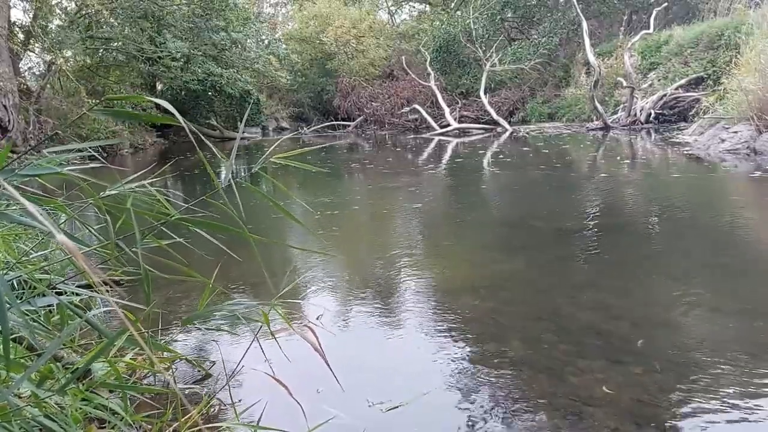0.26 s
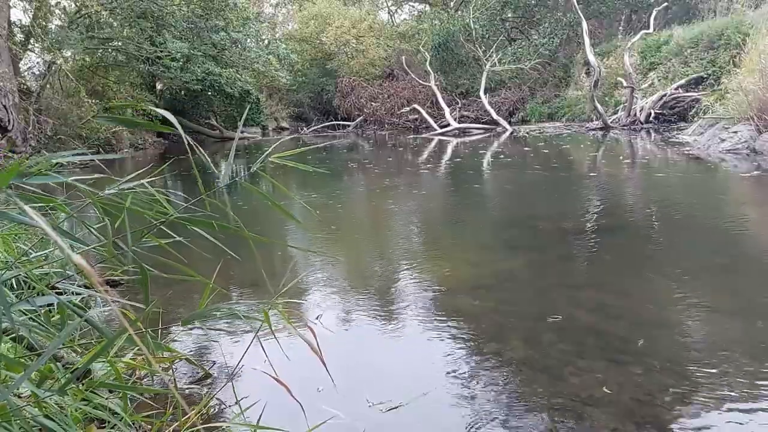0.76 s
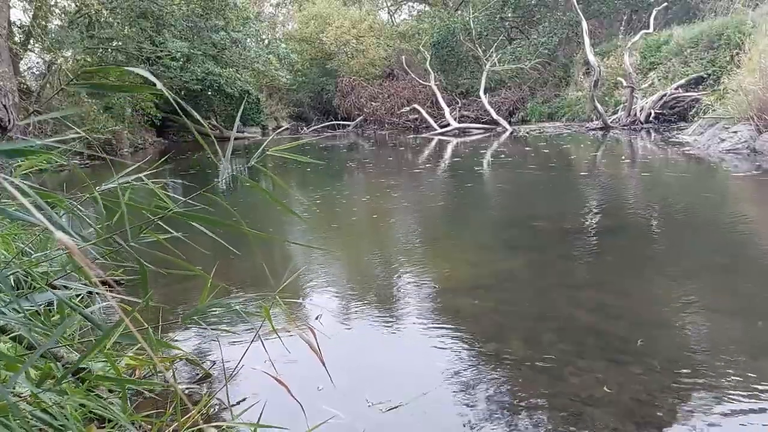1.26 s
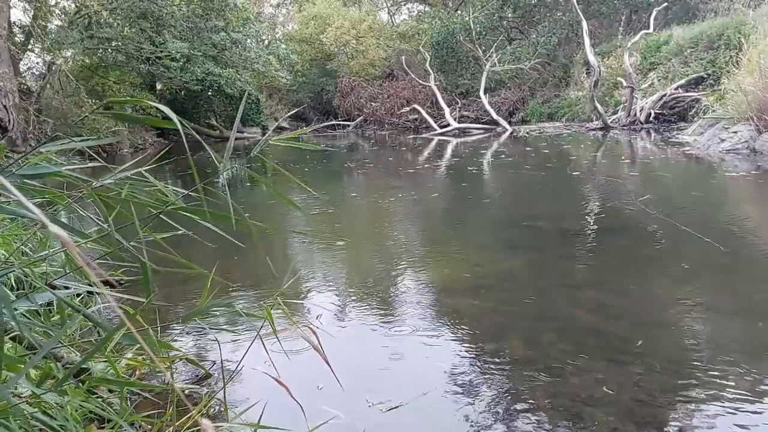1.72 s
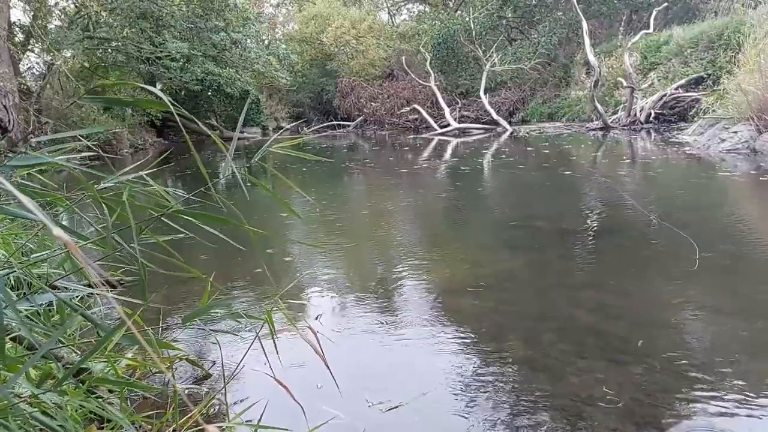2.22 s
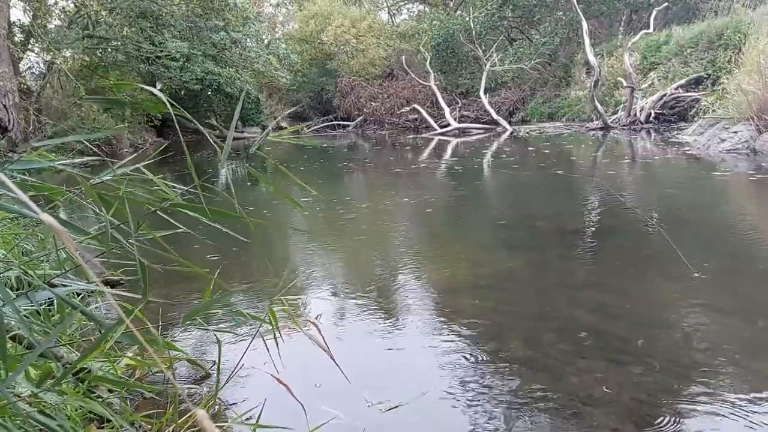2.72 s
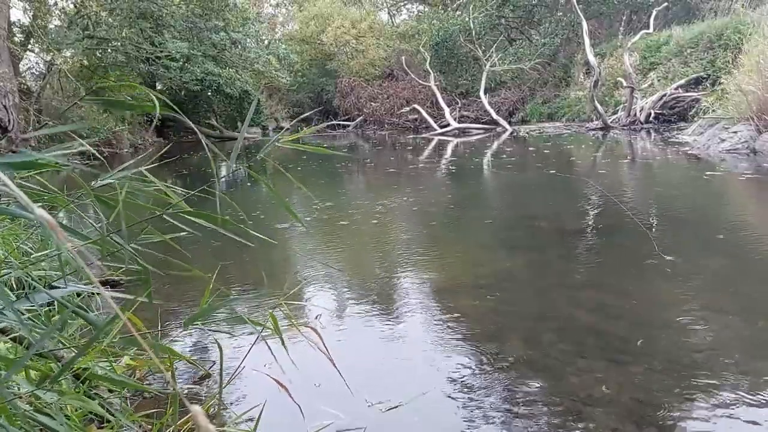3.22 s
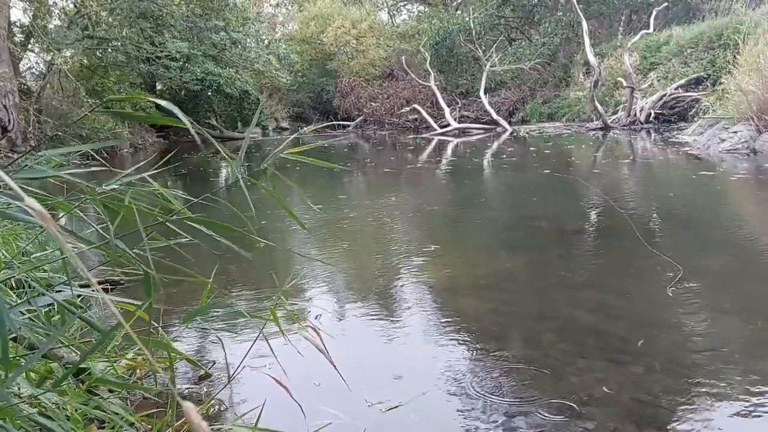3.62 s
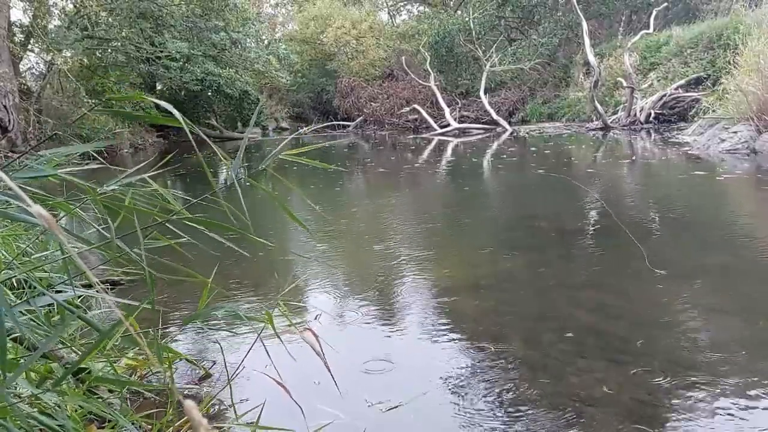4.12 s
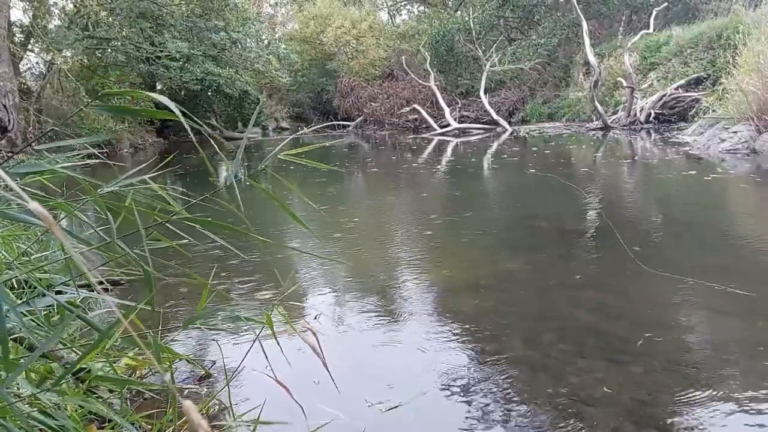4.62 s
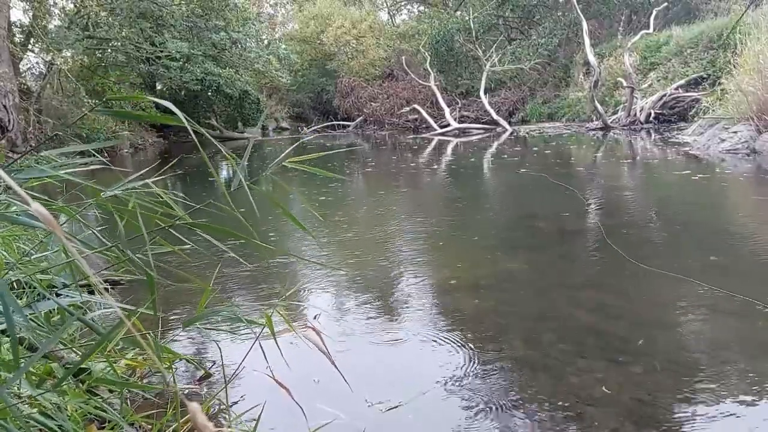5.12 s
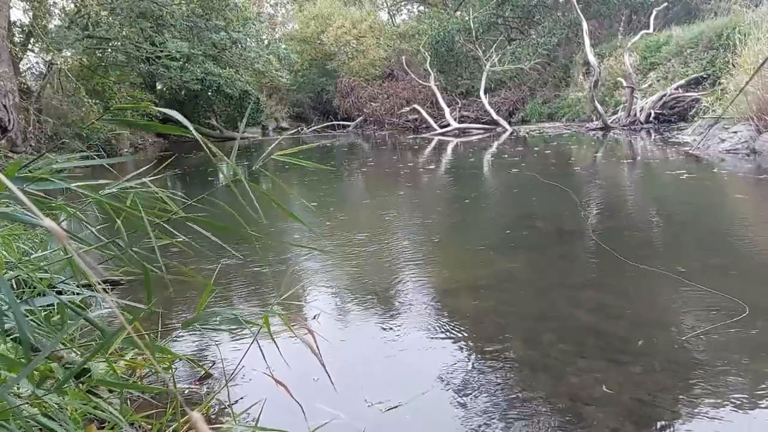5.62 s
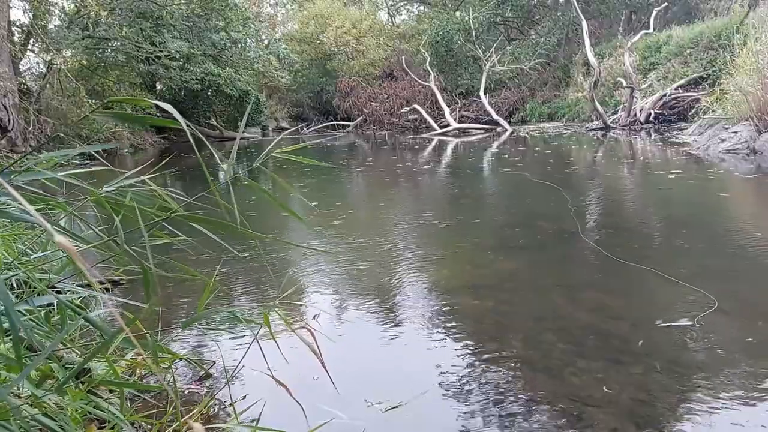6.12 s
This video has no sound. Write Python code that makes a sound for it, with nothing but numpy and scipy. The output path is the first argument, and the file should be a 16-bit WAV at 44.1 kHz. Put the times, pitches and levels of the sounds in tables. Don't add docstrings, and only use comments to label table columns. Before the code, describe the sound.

Beside a softly hissing stream, a fishing reel ratchets in a quick metallic rattle, clicks three more times, then line whips sharply through rod rings.

```python
import sys
import numpy as np
from scipy import signal
from scipy.fft import rfft, irfft
from scipy.io import wavfile
from scipy.ndimage import uniform_filter1d, minimum_filter1d, map_coordinates

SR = 44100
rng = np.random.default_rng(int(sys.argv[2]) if len(sys.argv) > 2 else 0)


def boost(x):
    u = np.asarray(x, float) / 20
    return 10 ** u


def to_wav(s):
    ch = np.atleast_2d(s).T
    pcm = np.round(np.clip(ch, -1, 1) * 32767)
    wavfile.write(sys.argv[1], SR, pcm.astype(np.int16))


N = 280476

# frequency in Hz, t60 in s, level under the main pawl in dB,
# level under the second pawl in dB.
FRAME_MODES = [(4190, 0.003, 0, -18.5), (3460, 0.018, -25.5, -34), (3780, 0.0077, -3.5, -2.5),
               (4630, 0.0061, -4, -1), (4960, 0.011, -16.5, -2.5), (5420, 0.019, -0.5, -5),
               (5975, 0.013, 0.5, -1), (5740, 0.0052, -85.5, -30), (8800, 0.0037, -1.5, -3),
               (9000, 0.012, -25, -8.5), (10610, 0.0063, -3, -11.5), (11440, 0.0093, -29, -8),
               (13010, 0.0042, 2.5, -4.5), (14900, 0.003, -23.5, -21)]
# frequency in Hz, time to the top in s,
# level under the main pawl in dB, level under the second pawl in dB.
SPOOL_MODE = (1995, .0017, -12, -29)
# delay in s, signed size for the main pawl, for the second pawl.
BOUNCES = [
    (0, -1.0, -.6),
    (.0004, .15, .7),
    (.0009, .35, -.65),
    (.0014, -.25, .45),
    (.0020, .15, -.25),
]
# time in s, speed in teeth per s.
PULLS = [
    [(1.1256, 50.15), (1.1727, 127.89), (1.1863, 138.29), (1.2013, 134.33), (1.2824, 71.41), (1.373, 0)],
    [(2.6639, 37.4), (2.7217, 0)],
]
SECOND_LAG_TEETH = .484
PAWL_DB, PAWL_SPREAD_DB = (.2, -4.2), (.3, 1.0)
LONGEST_T60_S = .010
CRACK_HZ, CRACK_T60_S, CRACK_DB, CRACK_LATE_S = 3500, .0012, (8, 0), .0003
HAND_ON_S, HAND_T60_SHARE, HAND_DB, HAND_SHARP = 2.0, .9, -2, 1.03

# start in seconds, peak in dB, length in s.
JERKS = [
    (3.902, -5.5, .0033),
    (3.9058, -3, .0009),
    (3.9073, -.5, .0036),
    (3.9128, -6, .002),
    (3.9152, -6.5, .0025),
    (3.9175, -4, .0038),
    (3.9237, -.5, .0022),
    (3.9268, -9, .003),
    (3.931, -22, .009),
]
# frequency in Hz, density in dB per Hz.
WHIP_SPECTRUM = [(290, -74.5), (500, -32), (876, 27), (2800, -29.5), (4440, -28.5), (5510, -26),
                 (7780, -47.5), (13200, -39), (14200, -29.5), (15500, -70.5)]
WHISTLE_HZ, WHISTLE_FALL_HZ_PER_S = 6220, 36300
EDGE_HZ, EDGE_FALL_HZ_PER_S = 4800, 88000
# start in seconds, frequency in Hz, level in dB, t60 in s.
ROD_MODES = [
    (3.9285, 628, -18.5, .025),
    (3.9284, 1240, -18.5, .012),
    (3.9294, 1800, -49, .010),
    (3.929, 2700, -24, .006),
    (3.936, 870, -18, 0.046),
]

# onset in seconds, level in dB, length in s.
LEAD_INS = [
    (1.1254, -38, .008),
    (2.6636, -39, .009),
    (3.902, -36, .003),
]
# width as share of pitch, rise in s, t60 in s.
TICK, SQUEAK, DRIP = (.6, .0005, .006), (.02, .0018, .012), (.05, .0015, .17)
RUB, RUSTLE = (.16, .01, .15), (.6, .006, .15)
# start in seconds, level in dB, frequency in Hz.
TICKS = [
    (2.001, -47.5, 10500),
    (2.23, -48.5, 11000),
    (2.249, -44, 1500),
    (3.30, -54, 9000),
    (3.35, -47, 10500),
    (3.8472, -42.5, 12500),
    (3.8494, -34.5, 5200),
    (4.245, -54, 2500),
]
# start in seconds, level in dB, frequency in Hz.
SQUEAKS = [
    (.857, -28, 5280),
    (.8572, -42, 8400),
    (.869, -49, 8600),
    (.895, -39, 5300),
    (5.37, -52, 5100),
]
# start in seconds, level in dB, frequency in Hz.
DRIPS = [
    (1.33, -52, 613),
    (4.245, -46.5, 867),
    (5.088, -46, 864),
    (5.47, -56, 1120),
    (5.535, -57, 2030),
    (5.669, -46.5, 529),
    (5.678, -50, 881),
    (5.686, -53, 1760),
]
# start in seconds, level in dB, frequency in Hz.
RUBS = [
    (0.866, -49, 5180),
    (3.235, -48, 5830),
    (5.177, -55.5, 4200),
    (5.326, -49, 4320),
    (5.54, -48, 4160),
    (5.90, -54, 4300),
]
# start in seconds, level in dB, frequency in Hz.
RUSTLES = [
    (5.322, -54, 4500),
    (5.538, -53, 4600),
    (5.666, -57, 8000),
    (5.669, -50, 750),
    (5.672, -48.5, 3100),
    (5.899, -53.5, 4500),
]

# frequency in Hz, density in dB per Hz.
STREAM_SPECTRUM = [(24, -76.5), (40, -45.5), (113, -24.5), (165, -39), (200, -10), (302, -2.5), (372, -5),
                   (403, -5), (726, -8.5), (1800, -17), (2340, -21), (3960, -120)]
# frequency in Hz, density in dB per Hz.
LEAVES_SPECTRUM = [(880, -32), (1500, -40), (2110, -2), (2310, -1), (3120, 2), (5720, 2), (6890, -7),
                   (8130, -9.5), (13300, -5), (14200, -7.5), (15500, -29)]
STREAM_DB, LEAVES_DB, LEAVES_FADE_DB_PER_S = -52.5, -55, -0.01
BANK_DB, BANK_T60_S, BANK_END_S = -23.5, 0.19, 0.044
# time in s, gain in dB.
GAIN = [
    (0, 0.5),
    (1.03, 1.5),
    (1.4, -3.5),
    (2.5, -4),
    (3.1, 0.5),
    (3.81, -1),
    (3.97, -3.5),
    (4.9, -5),
    (5.33, -1.5),
    (6.36, -2),
]
HUSH_S, HUSH_DB = (3.885, 3.894), -30


def rms_one(x):
    return x / np.sqrt(np.mean(x ** 2) + 1e-20)


def ring(clicks, hz, t60):
    r, w = boost(-60 / (t60 * SR)), 2 * np.pi * hz / SR
    return signal.lfilter([0, np.sin(w)], [1, -2 * r * np.cos(w), r * r], clicks + 1e-18)


def band(x, low_hz, high_hz):
    edges = [max(low_hz, 20), min(high_hz, .45 * SR)]
    return signal.sosfilt(signal.butter(2, edges, "band", fs=SR, output="sos"), x)


def coloured(white, spectrum):
    hz = np.maximum(np.arange(len(white) // 2 + 1) * SR / len(white), 1)
    point_hz, point_db = np.transpose(spectrum)
    weight_db = np.interp(np.log(hz), np.log(point_hz), point_db)
    return rms_one(irfft(rfft(white) * boost(weight_db), len(white)))


def add(out, s, sound):
    i = round(s * SR)
    out[i:i + len(sound)] += sound[:N - i]


def landings():
    rows = []
    for pull in PULLS:
        s, speed = np.transpose(pull)
        t = np.arange(s[0], s[-1], 1 / SR)
        teeth = np.cumsum(np.interp(t, s, speed)) / SR
        for k in range(int(teeth[-1]) + 1):
            for second in (0, 1):
                mark = k + second * SECOND_LAG_TEETH
                if mark < teeth[-1]:
                    rows.append((np.interp(mark, teeth, t), second))
    return rows


def reel():
    out, t = np.zeros(N), np.arange(1200) / SR
    thin = signal.butter(6, 2500, "high", fs=SR, output="sos")
    drops = landings()
    spool_hz, spool_top_s, *spool_db = SPOOL_MODE
    chance = rng.standard_normal((len(drops), len(FRAME_MODES) + 2 * len(BOUNCES)))
    for (s, second), draw in zip(drops, chance):
        peak_db = PAWL_DB[second] + PAWL_SPREAD_DB[second] * draw[-5]
        held = s > HAND_ON_S
        uneven_db = (.8 + .7 * second) * draw
        detune = 1 + .015 * draw[::-1]

        blows = np.zeros(len(t))
        for (delay, *size), late, harder in zip(BOUNCES, draw[-5:], draw[-10:-5]):
            i = int(abs(delay * (1 + .07 * late)) * SR)
            blows[i] += size[second] * boost(1.8 * harder * (delay > 0))

        frame = np.zeros(len(t))
        for m, (hz, t60, *levels) in enumerate(FRAME_MODES):
            mode = ring(blows, hz * detune[m], min(t60, LONGEST_T60_S))
            frame += boost(levels[second] + uneven_db[m]) * mode
        frame *= 1 - np.exp(-t / .00015)
        first_blow = np.roll(blows * (t < .0002), int(CRACK_LATE_S * SR))
        crack = boost(CRACK_DB[second]) * ring(first_blow, CRACK_HZ, CRACK_T60_S)
        frame = signal.sosfilt(thin, crack + frame)
        frame = boost(peak_db - .8) * frame / np.max(np.abs(frame))

        age = t / (spool_top_s * HAND_T60_SHARE ** held)
        swell = boost(spool_db[second] + HAND_DB * held) * age * np.exp(1 - age)
        hz = spool_hz * HAND_SHARP ** held * (1 + .008 * draw[0])
        add(out, s, frame + swell * np.sin(2 * np.pi * hz * t))
    return signal.sosfilt(signal.cheby2(8, 30, 1450, "high", fs=SR, output="sos"), out)


def whip():
    out, t = np.zeros(N), np.arange(2000) / SR
    for s, peak_db, length in JERKS:
        since = s - JERKS[0][0]
        hz = WHISTLE_HZ - WHISTLE_FALL_HZ_PER_S * since
        edge_hz = EDGE_HZ - EDGE_FALL_HZ_PER_S * since
        white = rng.standard_normal((2, 4000))
        whistle = rms_one(band(white[0], hz - 260, hz + 260))[2000:]
        rush = coloured(white[1], WHIP_SPECTRUM)
        for _ in range(3):
            rush = band(rush, edge_hz, 21000)
        rush = rms_one(rush)[2000:]
        shape = (1 - np.exp(-t / 0.0016)) / (1 + (t / length) ** 4)
        jerk = shape * (0.73 * whistle + 1.1 * rush)
        add(out, s, boost(peak_db) * jerk / np.max(np.abs(jerk)))
    return out


def knock():
    out, t = np.zeros(N), np.arange(2000) / SR
    push = np.exp(-t / 0.00011) * (t / 0.000061) / 8
    for s, hz, level_db, t60 in ROD_MODES:
        add(out, s, boost(level_db) * ring(push, hz, t60))
    return out


def lead_ins():
    out = np.zeros(N)
    before_s = np.arange(1000, 0, -1) / SR
    for s, level_db, length in LEAD_INS:
        swell_noise = rms_one(band(rng.standard_normal(1500), 1400, 9000)[500:])
        add(out, s - 1000 / SR, boost(level_db - 14 * before_s / length) * swell_noise)
    return out


def puff(level_db, hz, share, rise, t60):
    t = np.arange(6000) / SR
    half_hz = share * hz / 2
    noise = rms_one(band(rng.standard_normal(8000), hz - half_hz, hz + half_hz)[2000:])
    clear = np.clip(1 - 5 * share, 0, .9)
    tone = np.sin(2 * np.pi * hz * t)
    sound = np.sqrt(1 - clear) * noise + np.sqrt(2 * clear) * tone
    shape = np.clip(t / rise, 0, 1) * boost(-60 * np.maximum(t - rise, 0) / t60)
    return boost(level_db) * rms_one(sound * shape) * np.sqrt(np.mean(shape ** 2))


def small_sounds():
    out = np.zeros(N)
    kinds = [(TICK, TICKS), (SQUEAK, SQUEAKS), (DRIP, DRIPS), (RUB, RUBS), (RUSTLE, RUSTLES)]
    for kind, rows in kinds:
        for s, level_db, hz in rows:
            add(out, s, puff(level_db, hz, *kind))
    return out


def bank(x, low_hz):
    t = np.arange(4400) / SR
    flutter = .4 + rms_one(band(rng.standard_normal(N), 120, 600))
    echoes = rng.standard_normal(len(t)) * boost(-60 * t / BANK_T60_S) * np.clip(t / 0.001, 0, 1)
    echoes *= boost(-900 * np.maximum(t - BANK_END_S, 0))
    scatter = boost(BANK_DB - 19.5) * signal.fftconvolve(x * flutter, echoes)[:N]
    return signal.sosfilt(signal.butter(8, low_hz, "high", fs=SR, output="sos"), scatter)


def drift(rate):
    r = np.exp(-80 * np.pi * rate / SR)
    slow = signal.lfilter([1], [1, -2 * r, r * r], rng.standard_normal(N // 40 + 2002))[2000:]
    return np.interp(np.arange(N) / 40, np.arange(len(slow)), rms_one(slow))


def hiss(spectrum, patchy_db):
    hz, t, cells = signal.stft(coloured(rng.standard_normal(N), spectrum), SR, nperseg=512)
    together = drift(5)
    at = np.minimum((t * SR).astype(int), N - 1)
    flicker = np.array([.7 * together + drift(12) for region in range(12)])[:, at]
    place = 11 * np.log(np.clip(hz, 150, 16000) / 150) / np.log(16000 / 150)
    field = map_coordinates(flicker, np.meshgrid(place, np.arange(len(t)), indexing="ij"), order=1)
    return rms_one(signal.istft(cells * boost(patchy_db * field), SR, nperseg=512)[1][:N])


def scene():
    t = np.arange(N) / SR
    pawls = reel()
    line = signal.sosfilt(signal.butter(5, 450, "high", fs=SR, output="sos"), whip() + knock())
    tackle = pawls + bank(pawls, low_hz=1650) + line + bank(line, low_hz=450)
    gain_db = np.interp(t, *np.transpose(GAIN))
    hushed = 1. * (t > HUSH_S[0]) * (t < HUSH_S[1])
    hush_db = HUSH_DB * uniform_filter1d(hushed, size=89)
    stream = boost(STREAM_DB + gain_db) * hiss(STREAM_SPECTRUM, patchy_db=0.06)
    leaves_db = LEAVES_DB - LEAVES_FADE_DB_PER_S * t + gain_db + hush_db
    leaves = boost(leaves_db) * hiss(LEAVES_SPECTRUM, patchy_db=.5)
    return (tackle + lead_ins() + small_sounds() + stream + leaves)[None]


def roll_off(x):
    return signal.sosfilt(signal.butter(12, 15710, fs=SR, output="sos"), x)


def record(dry):
    cut = signal.sosfilt(signal.cheby2(6, 45, 16300, fs=SR, output="sos"), dry)
    allowed = minimum_filter1d(1 / np.maximum(np.abs(cut), 1), size=61)
    mix = cut * uniform_filter1d(allowed, size=61)
    return roll_off(mix)


dry = scene()
out = record(dry)
to_wav(out)
```